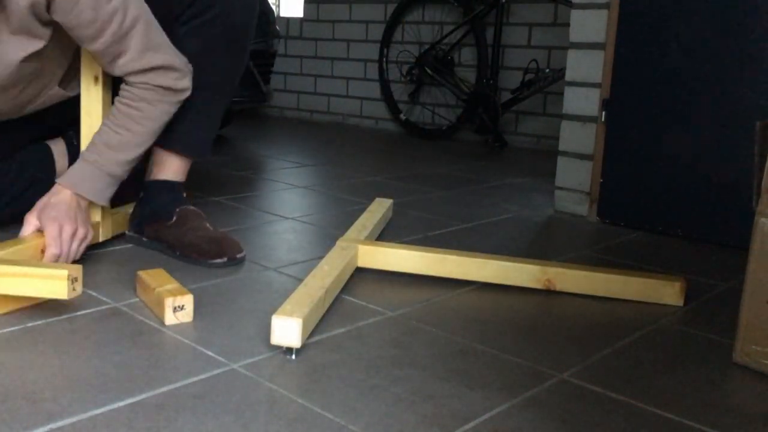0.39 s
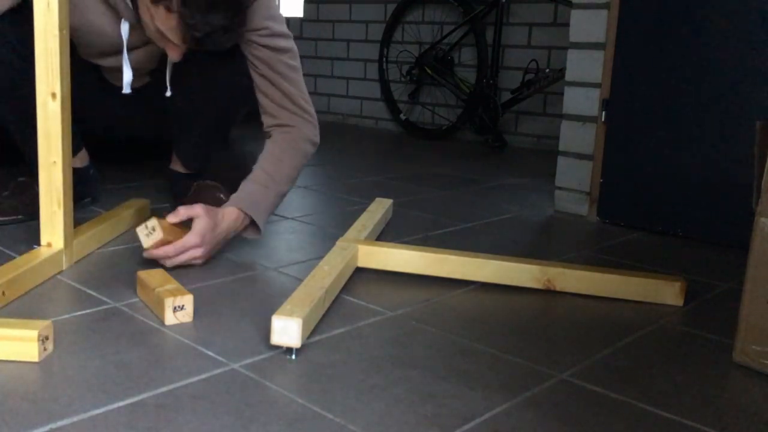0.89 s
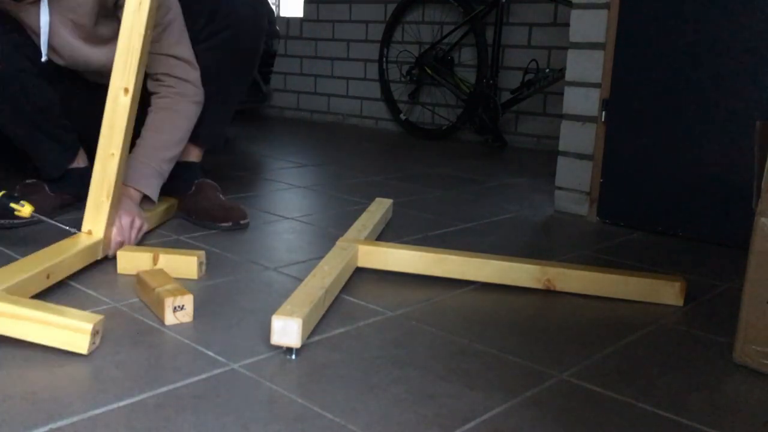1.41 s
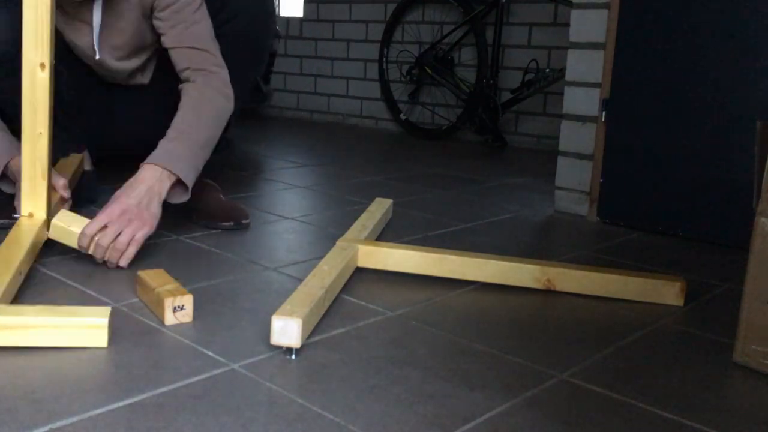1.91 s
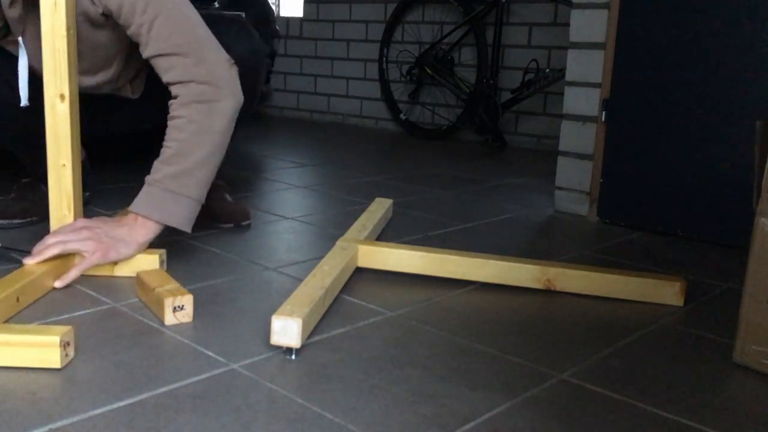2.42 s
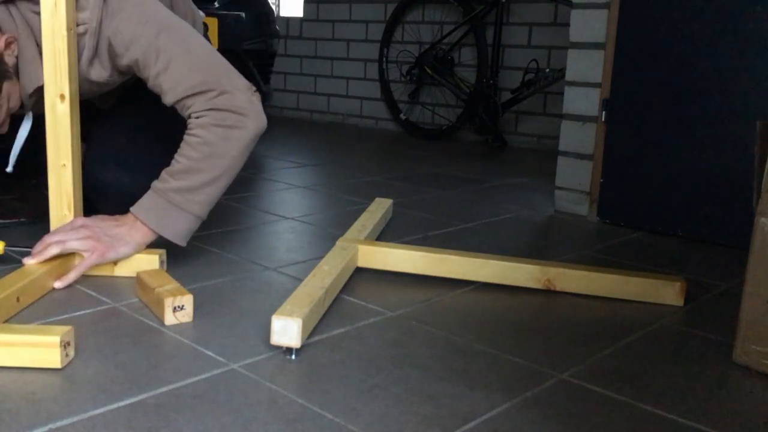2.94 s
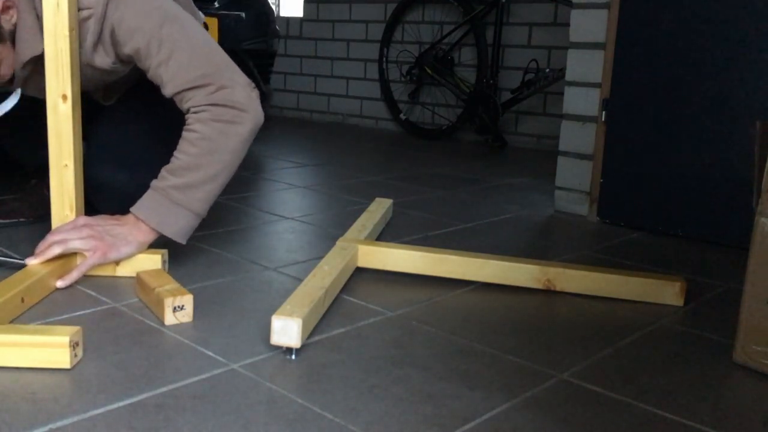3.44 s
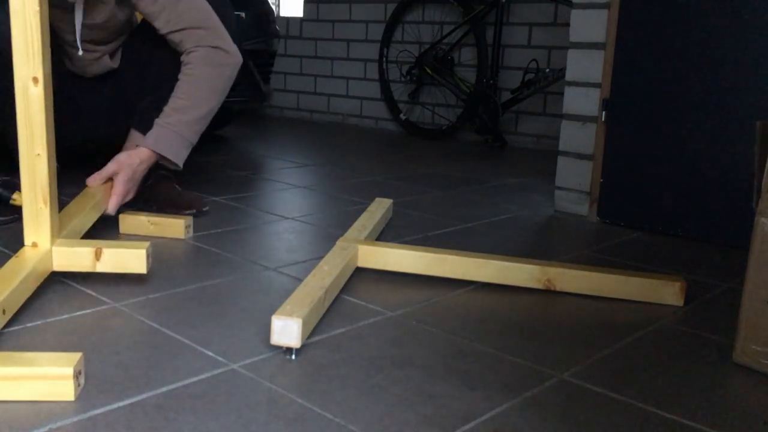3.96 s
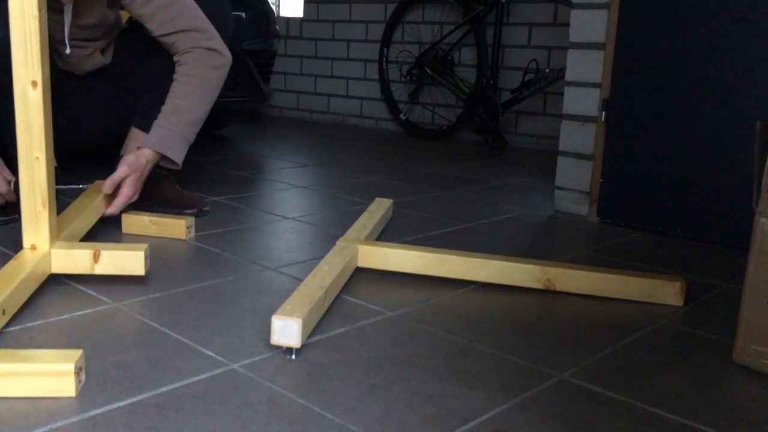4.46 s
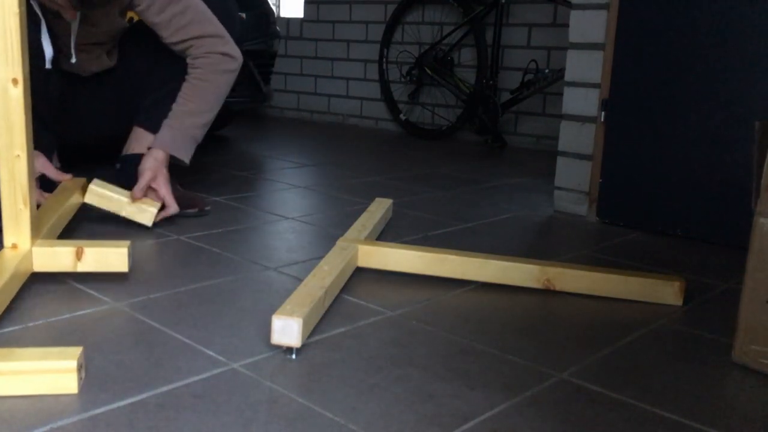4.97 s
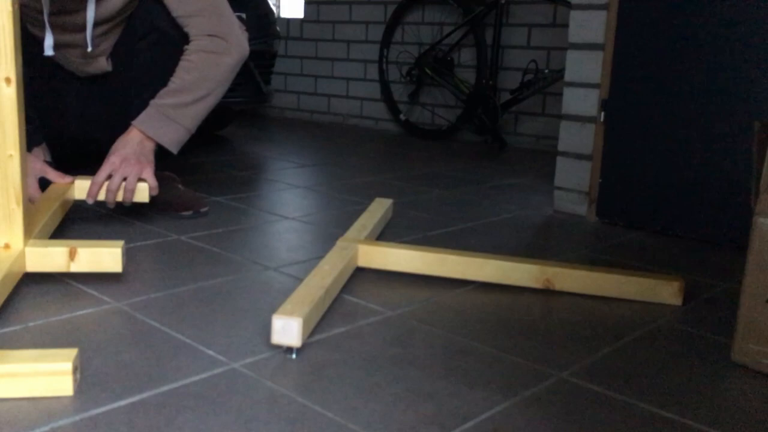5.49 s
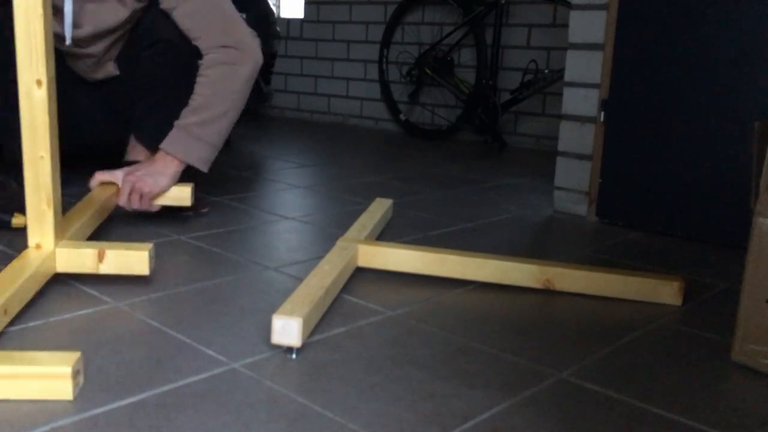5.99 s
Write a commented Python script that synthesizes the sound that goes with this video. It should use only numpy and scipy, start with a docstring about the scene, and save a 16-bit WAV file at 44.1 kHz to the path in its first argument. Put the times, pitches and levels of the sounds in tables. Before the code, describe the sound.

A wooden frame is screwed together, heard as quick faded snatches at a single microphone in a hard tiled room. Blocks knock first, dry rustle and small ratchet clicks between them; beam ends thud softly and a run of clicks goes with scraping wood. After a quiet middle come isolated clicks, a hard corner crack with loud knocks, and finally fast, continuous bright ratchet clicking with wood shuffling.

```python
"""A wooden frame is screwed together in a tiled garage, heard sped up as short faded snatches at one microphone.
Low room rumble and shuffling run throughout. Wooden knocks, puffs of rustle and a few ratchet clicks come first;
soft beam landings and a longer run of clicks follow from about 1 s, with slides of wood from 1.3 s. After a sparse
stretch from 2.4 s come more clicks, a hard corner crack at 4.09 s and dense ratcheting from 4.5 s to 6 s.
Clicks, echoes and knocks are excited modes; rustle and room are coloured noise; landings are low pulses."""
import sys
import numpy as np
from scipy import signal
from scipy.fft import rfft, irfft, next_fast_len
from scipy.io import wavfile
from scipy.ndimage import uniform_filter1d, map_coordinates

SR = 44100
rng = np.random.default_rng(int(sys.argv[2]) if len(sys.argv) > 2 else 0)


def ratio_of_db(decibels):
    """Turn decibels (scalar or array-like) into linear amplitude factors; 0 dB maps to 1."""
    return 10 ** (np.asarray(decibels, float) / 20)


def wav_out(sig):
    """Save sig, one row per channel (or a flat mono array), as 16-bit PCM at SR to the path in sys.argv[1]."""
    wavfile.write(sys.argv[1], SR, np.round(np.clip(np.atleast_2d(sig).T, -1, 1) * 32767).astype(np.int16))


N = 269892


def unit(x):
    """Scales a sound to rms 1."""
    return x / np.sqrt(np.mean(x ** 2) + 1e-20)


def filtered(x, response):
    """Multiplies the spectrum of x by a response of frequency."""
    m = next_fast_len(N + 8192)
    return irfft(rfft(x, m) * response(np.fft.rfftfreq(m, 1 / SR)), m)[:N]


def colour(points, tilt_db=0):
    """Spectrum through (Hz, dB) points on a log axis, tilted in dB per octave about 7 kHz."""
    f, db = np.transpose(points)

    def response(hz):
        shape_db = np.interp(np.log(hz + 1), np.log(f), db, -90, db[-1])
        return ratio_of_db(shape_db + tilt_db * np.log2(np.maximum(hz, f[0]) / 7000))
    return response


def modes(table):
    """Causal sum of resonances with alternating sign."""
    def response(f):
        return sum((-1) ** k * ratio_of_db(db) * 1j * f * width / (centre ** 2 - f * f + 1j * f * width)
                   for k, (centre, width, db) in enumerate(table))
    return response


def noise(response):
    """Fresh coloured noise of rms 1, drawn as a random spectrum."""
    m = next_fast_len(N, real=True)
    re, im = rng.standard_normal((2, m // 2 + 1))
    return unit(irfft((re + 1j * im) * response(np.fft.rfftfreq(m, 1 / SR)), m)[:N])


def wobble(rate):
    """A smooth random curve through the given number of knots a second."""
    coarse = np.arange(0, N + 8, 8)
    knots = rng.standard_normal(int(N * rate / SR) + 4)
    return np.interp(np.arange(N), coarse, map_coordinates(knots, [coarse * rate / SR]))


def add(track, s, fade_in_ms, fade_out_ms, db, sound):
    """Lets a sound through under a cosine-power fade that peaks at s; the sound may use the fade to change colour."""
    rise = max(fade_in_ms, .3) * SR / 1000
    fall = max(fade_out_ms, .3) * SR / 1000
    i = np.arange(max(int(s * SR - rise), 0), min(int(s * SR + fall), N))
    u = i - s * SR
    fade = np.abs(np.cos(np.pi / 2 * np.where(u < 0, u / rise, u / fall)))
    track[i] += ratio_of_db(db) * fade ** 2.11 * unit(sound(i, fade))


def patchy(x, patchy_db):
    """Varies level and colour at random over patches of about 30 ms, as in snatches from different moments."""
    z = signal.stft(x, nperseg=512)[2]
    field = uniform_filter1d(rng.standard_normal(z.shape), size=8, axis=0)  # across frequency
    field = uniform_filter1d(field, size=5, axis=1)  # across time
    return unit(signal.istft(z * ratio_of_db(patchy_db * unit(field)), nperseg=512)[1][:N])


# how busily hands and beams move: (time [s], wood shuffle level before its wobble [dB])
BUSTLE = [(0, -55.5), (.15, -60.5), (.58, -56.5), (.99, -61.5), (1.16, -60), (1.41, -47), (2.01, -50),
          (2.11, -67.5), (2.25, -64.5), (2.32, -58.5), (2.56, -64), (3.17, -55), (3.9, -57.5), (4.5, -62.5),
          (4.72, -52.5), (5, -62.5), (5.13, -54.5), (5.4, -52), (5.49, -79), (5.59, -51), (6.02, -51.5),
          (6.12, -58)]
# noise colours of the room: (frequency [Hz], relative density [dB per Hz])
RUMBLE_COLOUR = [(12, -38), (20, -8), (70, 2.5), (133, -4), (189, -12.5), (300, -18), (390, -23),
                 (660, -120)]
SHUFFLE_COLOUR = [(180, -12), (260, 1.5), (700, -1), (900, -46)]
HISS_COLOUR = [(500, -12), (900, 1), (3000, -7.5), (5000, -9.5), (9000, -16.5), (16000, -24.5)]


def room():
    """Low rumble, hiss and the shuffle of hands and beams as coloured noise; all but the hiss waver."""
    wood_db = np.interp(np.arange(N) / SR, *np.transpose(BUSTLE))
    low_db = -60.5 + 0.57 * (wood_db - wood_db.mean())  # the low shuffle follows the bustle
    rumble = ratio_of_db(-48.5 + 1.1 * wobble(23.04)) * noise(colour(RUMBLE_COLOUR))
    low_shuffle = ratio_of_db(low_db) * patchy(noise(colour(SHUFFLE_COLOUR)), patchy_db=3.5)
    wood = patchy(noise(modes(WOOD_MODES)) + ratio_of_db(3.5) * noise(colour(HISS_COLOUR)), patchy_db=2.5)
    wood_shuffle = ratio_of_db(wood_db + 1.6 * wobble(30) + 2.9 * wobble(250)) * wood
    hiss = ratio_of_db(-73.5) * noise(colour(HISS_COLOUR))
    return rumble + low_shuffle + wood_shuffle + hiss


# faded snatches of ringing wood:
# (time [s], fade-in [ms], level [dB], most excited frequency [Hz], second most excited frequency [Hz])
KNOCKS = [(.016, 9.4, -49.5, 1090, 2180), (.069, 16, -14, 2590, 2040), (.076, 14, -29.5, 468, 620),
          (.183, 20, -42.5, 1090, 2180), (.508, 17, -32.5, 2180, 867), (.531, 9.5, -46, 2180, 1090),
          (.617, 8.4, -38, 867, 1090), (0.633, 12, -15, 1370, 2590), (.634, 13.5, -20.5, 2180, 2040),
          (.657, 26, -31, 2180, 1230), (.688, 15.8, -16.5, 2180, 1090), (.824, 2.05, -27.5, 1090, 2180),
          (0.902, 16, -41.5, 1230, 2040), (.933, 18, -43, 867, 1090), (1.043, 1.3, -20, 1370, 620),
          (1.056, 8, -21, 1370, 468), (1.075, 13, -22.5, 2180, 3360), (1.154, 11, -44.5, 867, 300),
          (1.168, 0.89, -22.5, 1230, 2180), (1.203, 15.3, -25.5, 2180, 1230), (1.205, 12, -32.5, 468, 620),
          (1.333, 10, -41.5, 2590, 620), (1.37, 16, -41.5, 1230, 620), (1.401, 8.8, -37, 1230, 867),
          (1.432, 14.3, -37, 1230, 2180), (1.506, 16, -43, 2180, 1230), (1.538, 9, -39.5, 1090, 2180),
          (1.576, 23, -36.5, 1230, 3100), (1.604, 11, -41, 1230, 2180), (1.636, 10.3, -34, 1230, 300),
          (1.769, 13, -43, 3590, 2590), (1.906, 28, -43, 2180, 3100), (1.971, 14, -42.5, 2180, 1090),
          (2.004, 10, -39.5, 1090, 300), (2.329, 48, -39, 2180, 468), (2.359, 9.5, -35.5, 1230, 620),
          (3.449, 10.2, -24, 1230, 867), (3.449, 10, -28.5, 2180, 2590), (3.299, 8.3, -44.5, 2180, 1090),
          (3.397, 13, -49, 1230, 2180), (3.695, 13, -47, 1230, 2590), (3.769, 8.6, -44, 1230, 468),
          (3.843, 18, -43.5, 2180, 620), (3.897, 1.4, -35.5, 3590, 2590), (4.084, 8, -30.5, 867, 1090),
          (4.096, 9.5, -18, 1370, 3590), (4.197, 18, -44.5, 867, 620), (4.247, 1.6, -24.5, 867, 1090),
          (4.273, 17, -12, 867, 1090), (4.273, 12.4, -22, 2590, 3590), (4.291, 11.4, -20, 3360, 2180),
          (4.517, 39, -43.5, 620, 867), (4.638, 6.6, -33.5, 867, 1090), (4.741, 10, -43, 1650, 2180),
          (4.986, 12, -44.5, 1650, 2590), (5.061, 10, -42.5, 1650, 2180), (5.506, 2.2, -32, 300, 1230),
          (5.582, 18, -40.5, 1650, 620), (5.745, 18, -41, 620, 300), (5.852, 12, -39, 2180, 3100),
          (6.086, 12, -45, 300, 1090)]
# beam and block modes: (frequency [Hz], width [Hz], relative level [dB])
WOOD_MODES = [(300, 36, -3.5), (468, 26.2, -4), (620, 21.3, -3.5), (867, 14.65, -1), (1090, 23.14, -1.5),
              (1230, 39.45, -1.5), (1370, 30, -4.5), (1650, 40, -12.5), (2040, 30, 0), (2180, 35.4, -0.5),
              (2590, 19.7, -1), (3100, 33, -9), (3360, 48, -5), (3590, 51.5, -2)]
# broad clack of wood contacts: (frequency [Hz], relative density [dB per Hz])
CLACK_COLOUR = [(250, -28.5), (600, -14), (800, 2), (1500, 4), (3500, -3), (4500, -12.5), (9000, -42.5),
                (16000, -37.5)]


def knocks():
    """Wood modes kept stirring by their own echoes and cut short by the fades, with a broad clack on top."""
    grain = ratio_of_db(1.6 * wobble(250))
    hz, width, base_db = np.transpose(WOOD_MODES)
    dull = noise(colour(CLACK_COLOUR, tilt_db=-4))
    bright = noise(colour(CLACK_COLOUR, tilt_db=0.0))

    def rings(i):
        """Each mode is a sine whose phase drifts as fast as its width allows."""
        steps = rng.standard_normal((len(hz), SR // 15))
        drift = np.cumsum(steps, axis=1)[:, :len(i)] * np.sqrt(2 * np.pi * width[:, None] / SR)
        start = rng.random((len(hz), 1))
        return np.sin(2 * np.pi * (hz[:, None] * i / SR + start) + drift)

    def favour(near_hz):
        """The place of the blow favours modes near one frequency; others fall away with distance."""
        octaves = np.log2(hz / near_hz)
        loss_db = 9 * (1 - np.exp(-(octaves / 0.043) ** 2)) + 5.5 * abs(octaves)
        loss_db += 2.4 * np.maximum(octaves, 0) + 4.4 * np.maximum(-octaves, 0) * (hz < 700)
        return ratio_of_db(-loss_db)

    # the later a knock sits in its snatch, the less is left after it
    blows = [(row, 21.2 - 0.16 * row[1]) for row in KNOCKS]
    # one hard corner blow, columns as in KNOCKS, gone in 3.6 ms
    blows.append(((4.0903, 1.2, -4.5, 3588, 2591), 3.6))
    out = np.zeros(N)
    for (s, fade_in, db, first_hz, second_hz), fade_out in blows:
        gains = ratio_of_db(base_db + rng.normal(0, 1.67, len(hz)))
        gains = gains * np.maximum(favour(first_hz), ratio_of_db(-1.5) * favour(second_hz))
        lean_db = 5 * np.log2(first_hz * second_hz / 1500 ** 2)  # blows that favour high modes clack brighter
        clack_db = -9 - 0.14 * db  # the quieter the knock, the larger the share of broad clack

        def blow(i, fade):
            clack = unit(dull[i] * ratio_of_db(-lean_db) + bright[i] * ratio_of_db(lean_db))
            return grain[i] * (unit(gains @ rings(i)) + ratio_of_db(clack_db) * clack)
        add(out, s, fade_in, fade_out, db, blow)
    return out


# faded snatches of rustle, the very dull rows being the upper part of knocks:
# (time [s], half length [ms], level [dB], relative brightness [dB])
RUSTLES = [(.08, 20.6, -37, -7), (.165, 20, -50.5, -24), (.466, 12, -41.5, 0.5), (0.487, 15, -42, -1),
           (.634, 14, -37, -18), (.69, 12, -31.5, -40), (.745, 44, -46, -0.5), (0.801, 24, -41.5, 1.5),
           (.829, 16, -39, -5), (.894, 11, -50, 1), (0.917, 16, -52, -3), (0.946, 21, -52, 1),
           (0.977, 16, -48.5, 1), (1.013, 42, -43, -0.5), (1.052, 23, -43, 2), (1.102, 26, -42, -1),
           (1.172, 9.1, -31, -36), (1.277, 10, -50, -15), (1.437, 8, -48, 2), (1.885, 9.3, -45, 0),
           (2.328, 18, -42, -5), (2.35, 18, -36, -17), (2.433, 7.9, -49, -16), (2.569, 16, -59, -9),
           (2.711, 6.7, -45.5, -9), (2.811, 8.1, -50, -18), (2.909, 14, -44.5, -17), (2.936, 10, -53, -12),
           (2.982, 8.6, -54, -15), (3.142, 12, -42, -14), (3.175, 15, -48, -12), (3.571, 8.7, -58, -15),
           (3.677, 27, -49.5, -8), (3.756, 12, -49, -19), (3.791, 10, -47, -10), (3.858, 16, -47.5, -7),
           (3.886, 5, -44, -15), (3.9, 10, -34.5, -23), (4.094, 6.7, -31, 4), (4.122, 19, -40.5, -3),
           (4.157, 19.4, -42, -5), (4.233, 25, -46.5, 19), (4.275, 21, -27.5, -48),
           (4.346, 38, -54.5, -2.5), (4.481, 14.5, -51, -5), (4.529, 19, -52, -3), (4.588, 8.1, -43.5, 2),
           (4.677, 9.8, -42, 2), (4.876, 9.9, -49, 3), (5.133, 29, -47.5, -7), (5.586, 12, -48, -10),
           (5.266, 11, -42, -3), (5.315, 9, -45, 0), (5.607, 10, -46, -2), (5.686, 23.4, -38.5, 0),
           (5.717, 11, -47, 1), (5.831, 10, -41.5, -11), (5.906, 17, -46, -1), (6.088, 30, -45.5, -3.5)]
# colour of the rustle: (frequency [Hz], relative density [dB per Hz])
RUSTLE_COLOUR = [(700, -35.5), (1500, -11.5), (4000, 9.5), (6000, 5), (9000, -3), (10300, -1), (12000, -9),
                 (15500, -16.5)]
# ratchet pawl clicks, each opening or closing a snatch of echo; ratchet() plays the clicks, puffs() the echoes:
# (time [s], click level before a common 8.5 dB cut [dB], echo level [dB],
#  reach of the snatch after (+) or before (-) the click [ms], relative brightness [dB])
CLICKS = [(0.2004, -36, -38, 29.5, -4), (0.2573, -27, -34, 25, -3), (0.3143, -28, -34.5, -17, -1),
          (0.371, -26.5, -36.5, -19, -3), (0.405, -33, -36, 29, -1), (.419, -24, -43, 16, 3),
          (1.1683, -31, -40, 6, -22), (1.207, -27, -41, -24, -20), (1.2885, -32, -33, 29, -3.5),
          (1.344, -28, -40.5, -22, -3), (1.3677, -36, -42, 35, 0), (1.421, -24, -37, -31, -10),
          (1.4457, -20, -36.5, 21, -10), (1.4697, -20.5, -38, 14, -9), (1.4805, -32, -46, 8, -7),
          (1.509, -40, -37, -13, -6), (1.5345, -32, -35, 18, -4), (1.5586, -28.5, -36.5, 44, -4),
          (1.589, -45, -40.5, 34, -5), (1.6205, -23.5, -36.5, 50, -10), (1.6378, -25.5, -45, 8, -14),
          (1.654, -35, -36.5, 19, -5), (1.676, -40, -39.5, 32, -6), (1.7007, -33, -48, -17, -3),
          (1.7433, -27.5, -50, -27, -12), (1.7678, -36, -34, 27, -22), (1.7885, -26.5, -31.5, 12, -6),
          (1.83, -48, -42.5, -22, -5), (1.8547, -33, -37, 21, -4), (1.8933, -20, -33.5, 24, -3),
          (1.926, -46, -42, -20, -1), (1.9505, -24.5, -39, 39, -7), (1.9958, -22.5, -44, 13, -10),
          (2.0162, -29, -33.5, 24, -5), (2.3114, -39, -44, 10, -17), (2.358, -16, -26, 11.5, -6),
          (2.412, -33, -34, 12, -8), (3.0605, -28.5, -37.5, 26, -6), (3.1083, -41, -42, -7, -12),
          (3.1986, -25.5, -32.5, 18, -5), (3.231, -24, -36.5, -27, -9), (3.261, -38, -38, 22, -4),
          (3.2985, -26, -36, 20, -4), (3.3407, -29, -39, 16, -4), (3.509, -30, -36, 19, -0.5),
          (3.7046, -26, -33.5, 16.5, -3.5), (3.8213, -28.5, -41.5, -10, -5), (3.9256, -24, -36.5, 20, -5),
          (4.5054, -35, -49.5, -15, -14), (4.5549, -23.5, -35.5, 36, -3), (4.5612, -27, -47, 16, -2),
          (4.606, -18, -40, -23, 2), (4.6355, -19, -34, -22, -3), (4.6646, -19, -34, -15, -3),
          (4.694, -22, -33, 22, -1), (4.7103, -29, -48, 10, 2), (4.7337, -19, -33.5, -20, 2),
          (4.7561, -22.5, -37.5, 40, -0.5), (4.7938, -21, -32.5, 26, -9), (4.832, -19.5, -36, -24, -1),
          (4.8535, -26, -36.5, 34, -4), (4.907, -20.5, -39.5, -27, -8), (4.9387, -21, -38.5, -24, -4),
          (4.966, -32, -38.5, 39, -2), (5.0124, -22.5, -36, -22, -3), (5.0573, -23, -40, -33, -2),
          (5.0759, -25, -34.5, 35, -2), (5.093, -32, -48, 12, -1), (5.1642, -46, -45, 23, -3),
          (5.1775, -22, -33, 21, -3), (5.1885, -29, -48, 10, 5), (5.2263, -23.5, -34.5, -25, -4),
          (5.2552, -20, -39, -26, -4), (5.2956, -20.5, -34.5, -17, 0), (5.3253, -20, -28.5, 16, -1),
          (5.3397, -35, -52, 6, 0), (5.3606, -21, -35, -20, -6), (5.3714, -34, -45, 8, 4),
          (5.3923, -23, -33.5, 20, -2), (5.486, -51, -53, 11, -8), (5.5062, -27.5, -39, 32, -14),
          (5.615, -24.5, -31.5, 17, -6.5), (5.632, -39, -47, 12, -11), (5.6532, -24.5, -38, -20, -9),
          (5.7265, -29, -36.5, 28, -4), (5.7793, -21, -38, -24, -2.5), (5.8032, -26, -31.5, 17, -8),
          (5.8149, -24, -48, 10, 5), (5.839, -20.5, -35, 31, -3), (5.872, -18.5, -34, -16, -13),
          (5.8906, -34, -45, 22, -5), (5.92, -40, -53, 8, 3), (5.9358, -29, -42.5, -37, -12),
          (5.952, -23, -37.5, 42, -1), (5.9862, -23.5, -35.5, 30, -7.5), (6.0007, -34, -48, 10, -5),
          (6.027, -22, -37, -18, -1.5)]
# low and high steel modes of the ratchet: (frequency [Hz], width [Hz], relative level [dB])
PAWL_LOW = [(1860, 76, -26), (2476, 120, -43.5), (3330, 940, -4.5), (5083, 500, 2.5), (6090, 1230, 2.5)]
PAWL_HIGH = [(8246, 460, -1.5), (11540, 2800, -12), (15300, 4700, -15)]


def puffs():
    """Dense echo of the steel modes mixed with smooth rustle, grainy with small reflections, let through in fades."""
    grain = ratio_of_db(2.0 * wobble(500))
    low, high = noise(modes(PAWL_LOW)), noise(modes(PAWL_HIGH))
    dull = noise(colour(RUSTLE_COLOUR, tilt_db=-12.0))
    bright = noise(colour(RUSTLE_COLOUR, tilt_db=8.5))
    # last entry: steel ring over rustle [dB]
    snatches = []
    for s, _, db, reach, bright_db in CLICKS:
        # the click opens or closes its snatch, on the short side of the fade
        fade_in, fade_out = (3.3, reach) if reach > 0 else (-reach, 13.5)
        snatches.append((s, fade_in, fade_out, db, bright_db, 5))
    for s, half, db, bright_db in RUSTLES:
        snatches.append((s, half, half, db, bright_db, -7))
    out = np.zeros(N)
    for s, fade_in, fade_out, db, bright_db, ring_db in snatches:
        def puff(i, fade):
            # the treble of an echo dies first, so the edges of a snatch are duller
            steel = low[i] * ratio_of_db(-bright_db / 2) + fade ** 0.34 * high[i] * ratio_of_db(bright_db / 2)
            rustle = dull[i] * ratio_of_db(-bright_db - 2) + fade ** 0.28 * bright[i] * ratio_of_db(bright_db + 2)
            return grain[i] * (ratio_of_db(ring_db) * unit(steel) + unit(rustle))
        add(out, s, fade_in, fade_out, db, puff)
    return out


def ratchet():
    """Each pawl snap is a 5 ms noise burst ringing the steel modes, repeated duller off the tiles 3.9 ms later."""
    t = np.arange(SR // 200) / SR
    swell = (1 - np.exp(-t / 0.00023)) * ratio_of_db(-60 * t / 0.0064)
    hz = np.fft.rfftfreq(len(t), 1 / SR)
    steel = np.array([modes(PAWL_LOW)(hz), modes(PAWL_HIGH)(hz)])
    out = np.zeros(N + SR)
    for s, db, _, _, bright_db in CLICKS:
        high_db = 0.5 + 0.52 * bright_db  # high over low modes
        for delay_s, level_db, dull_db in ((0, db, 0), (.0039, db - 10.5, 4)):  # direct, then tile echo
            burst = rng.standard_normal((2, len(t)))
            low, high = irfft(rfft(burst) * steel, len(t)) * swell
            balance_db = (high_db - dull_db) / 2
            snap = unit(unit(low) * ratio_of_db(-balance_db) + unit(high) * ratio_of_db(balance_db))
            out[round((s + delay_s) * SR):][:len(t)] += ratio_of_db(level_db - 8.5) * snap
    return out[:N]


# a beam end lands softly: (time [s], frequency [Hz], peak level [dB], half width to 1/e [s])
BUMPS = [(2.75, 247, -49.5, .015), (1.06, 200, -34, 0.012), (1.16, 110, -37.5, .015), (1.2, 114, -35, .015),
         (1.125, 95, -27, .0052), (2.25, 57, -39.5, .02)]


def bumps():
    """One low push of the floor for each soft landing, a cosine under a bell-shaped swell."""
    t = np.arange(N) / SR
    out = np.zeros(N)
    for s, hz, db, half_s in BUMPS:
        swell = np.exp(-((t - s) / half_s) ** 2)
        out -= ratio_of_db(db) * np.cos(2 * np.pi * hz * (t - s)) * swell
    return out


# slides of wood: (time [s], half length [ms], level [dB], resonance [Hz], width of each filter pass [Hz])
RUBS = [(1.4, 77, -46, 200, 80), (1.5, 290, -50, 1230, 300), (2.17, 100, -64.5, 2060, 503),
        (2.22, 70, -67.5, 4970, 900), (2.54, 190, -62.5, 2070, 505), (3.78, 45, -51, 5150, 2000),
        (5.88, 210, -47, 620, 219), (5.9, 220, -51, 315, 120)]


def rubs():
    """Wood sliding on wood or tile: grainy friction noise that feeds one resonance at a time."""
    friction, grain = rng.standard_normal(N), ratio_of_db(2.5 * wobble(60))
    out = np.zeros(N)
    for s, half_ms, db, hz, width_hz in RUBS:
        band = signal.iirpeak(hz, hz / width_hz, SR)

        def slide(i, fade):
            once = signal.lfilter(*band, friction[i])
            return grain[i] * signal.lfilter(*band, once)
        add(out, s, half_ms, half_ms, db, slide)
    return out


def scene():
    """Everything reaches one microphone."""
    return (room() + knocks() + puffs() + ratchet() + bumps() + rubs())[None]


def low_pass(x):
    """Removes everything above the highest recorded frequency."""
    return signal.sosfilt(signal.butter(12, 16990, fs=SR, output="sos"), x)


# notches of the microphone port: (frequency [Hz], half width to 1/e [Hz], gain [dB])
PORT_NOTCHES = [(7210, 150, -3), (10320, 430, -6)]


def record(dry):
    """The microphone clips and its port cuts two notches."""
    def port(hz):
        return ratio_of_db(sum(db * np.exp(-((hz - c_hz) / w_hz) ** 2) for c_hz, w_hz, db in PORT_NOTCHES))
    mix = filtered(np.clip(dry[0], -1, 1), port)[None]
    return low_pass(mix)


dry = scene()
out = record(dry)
wav_out(out)
```